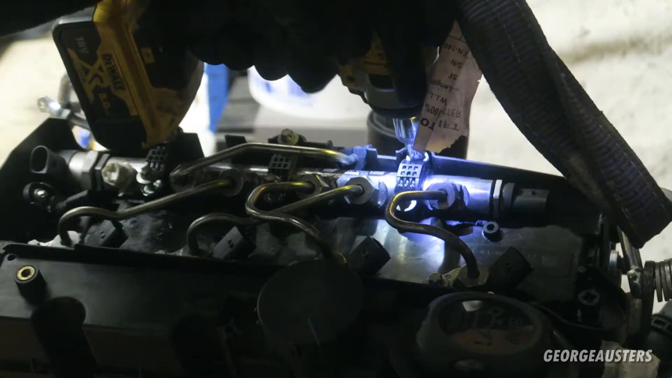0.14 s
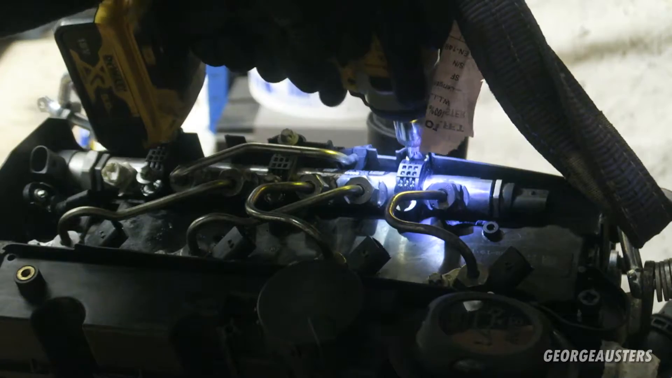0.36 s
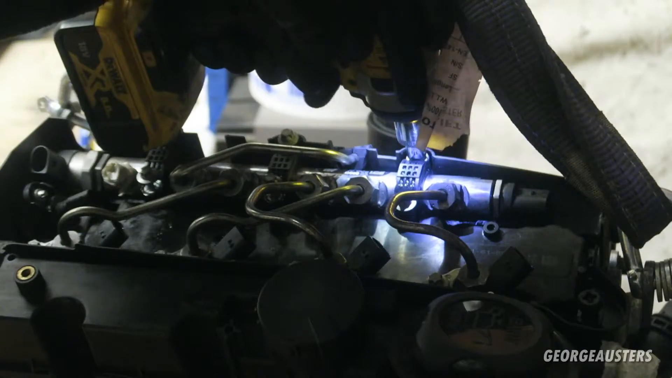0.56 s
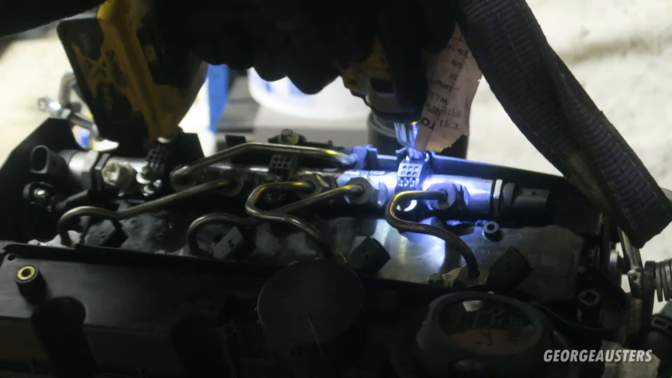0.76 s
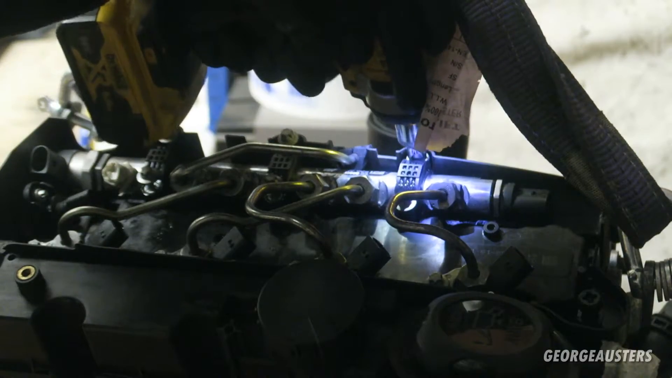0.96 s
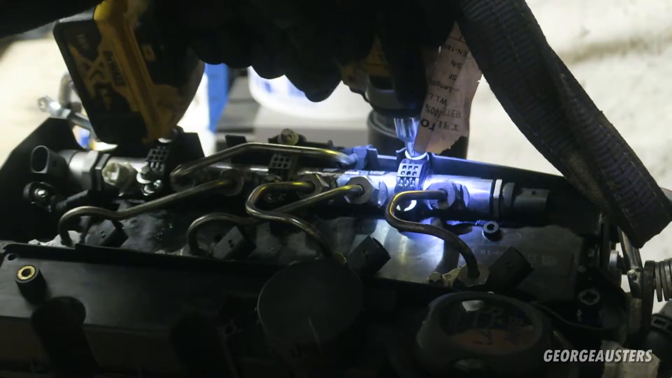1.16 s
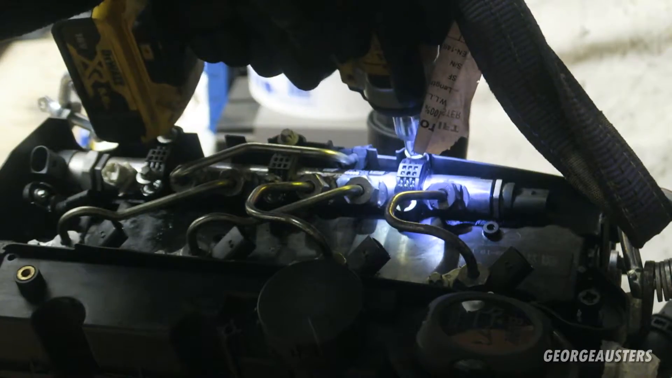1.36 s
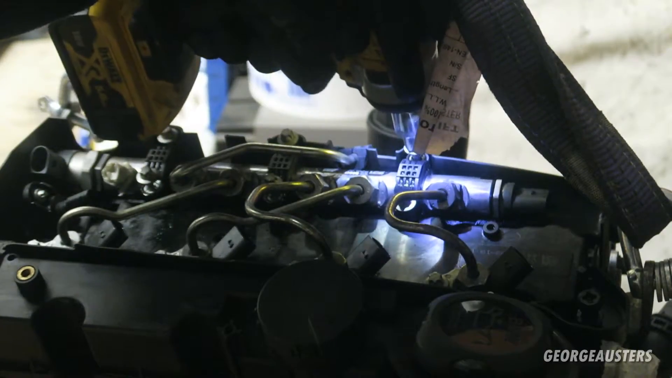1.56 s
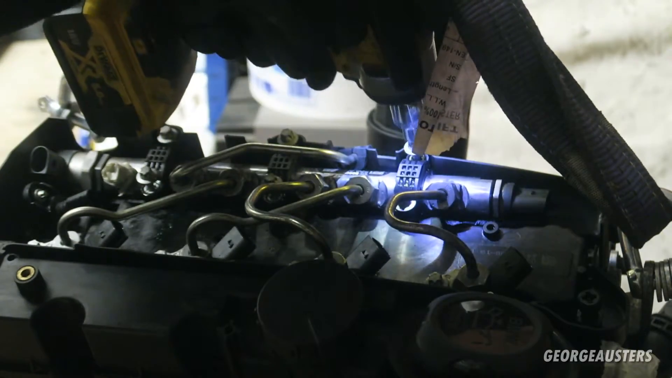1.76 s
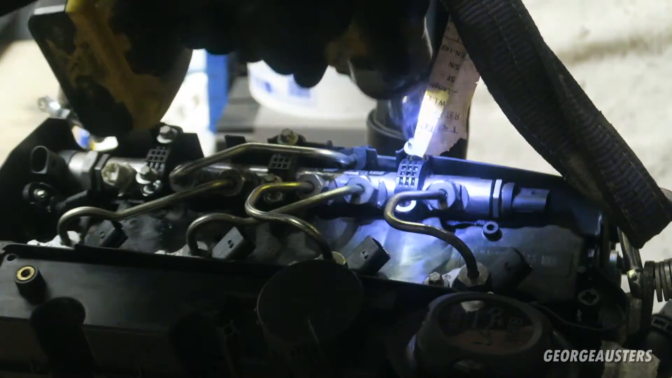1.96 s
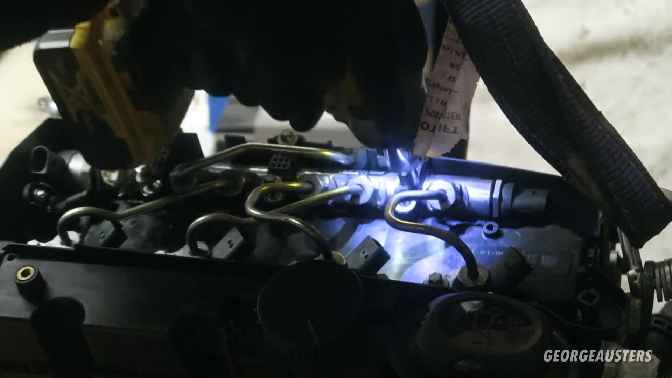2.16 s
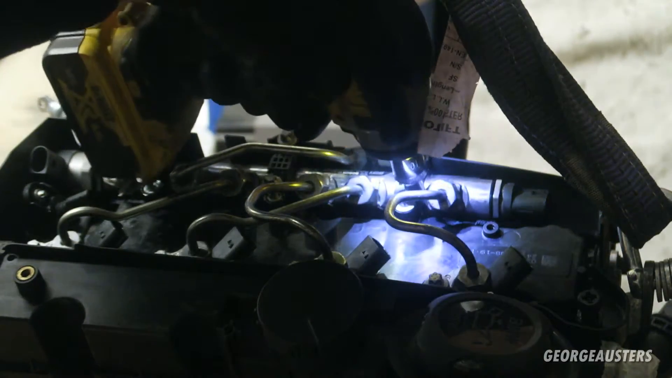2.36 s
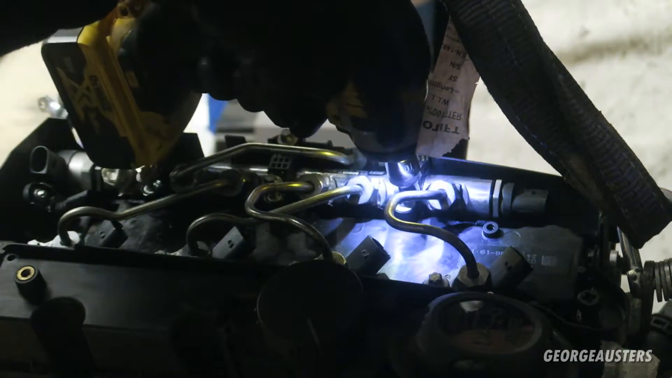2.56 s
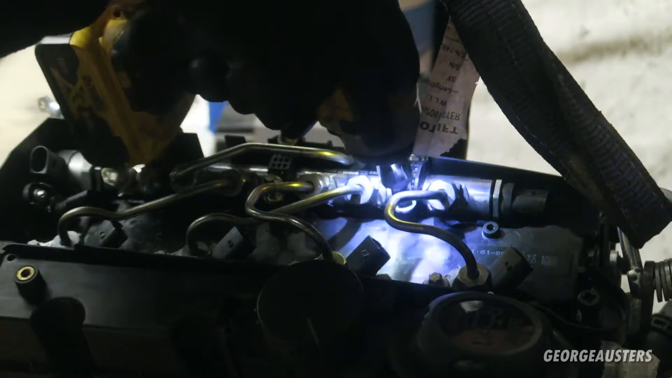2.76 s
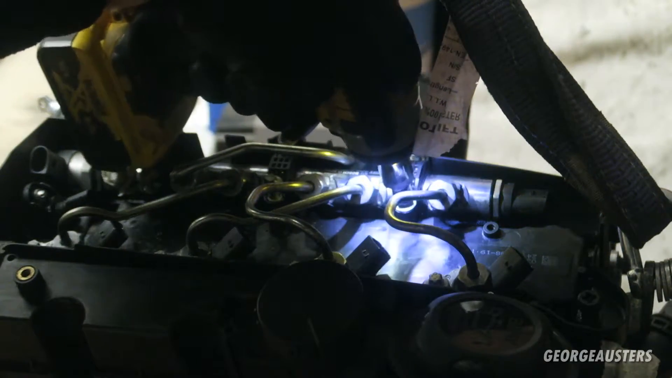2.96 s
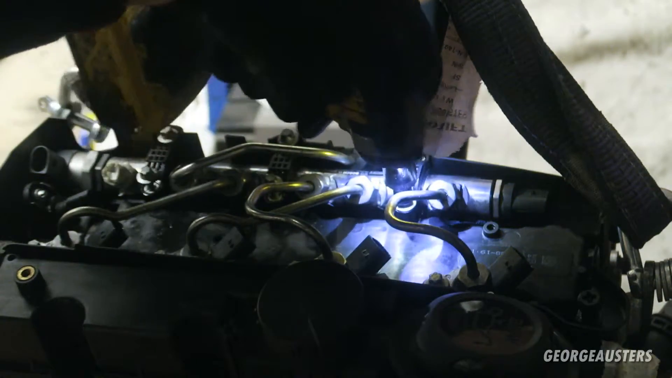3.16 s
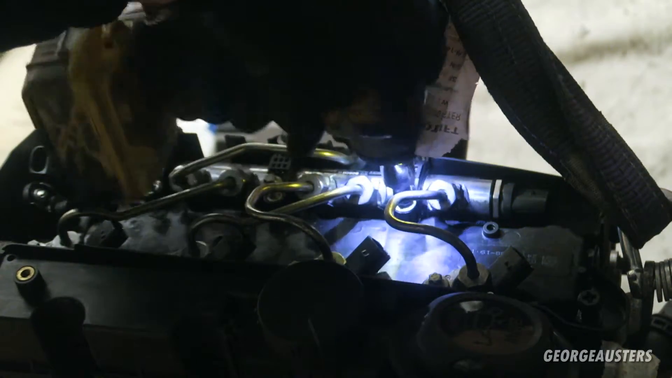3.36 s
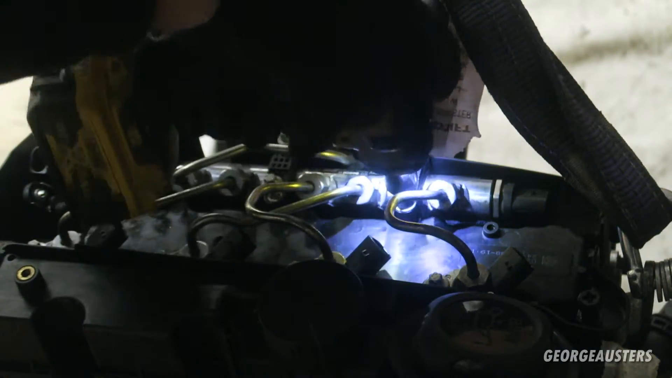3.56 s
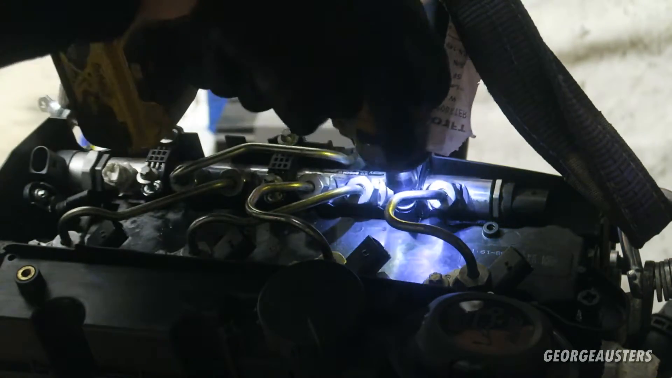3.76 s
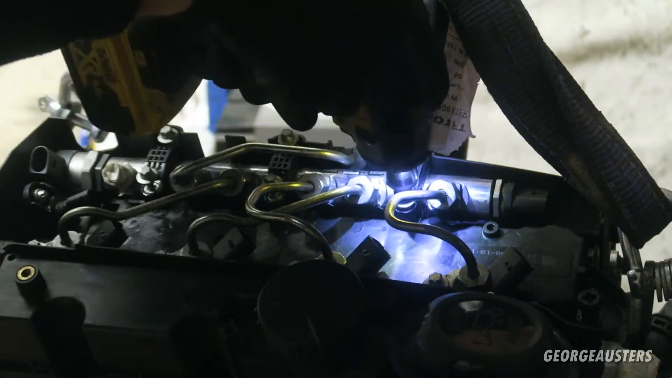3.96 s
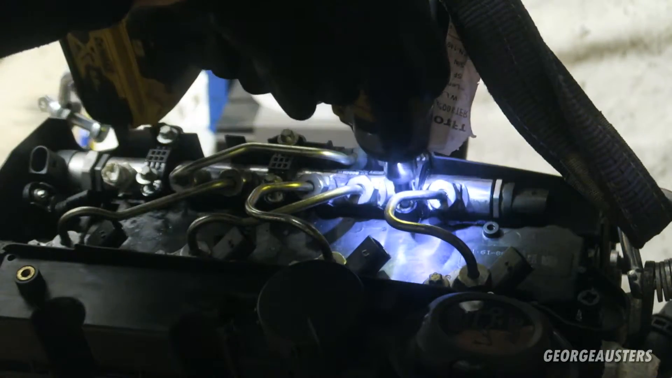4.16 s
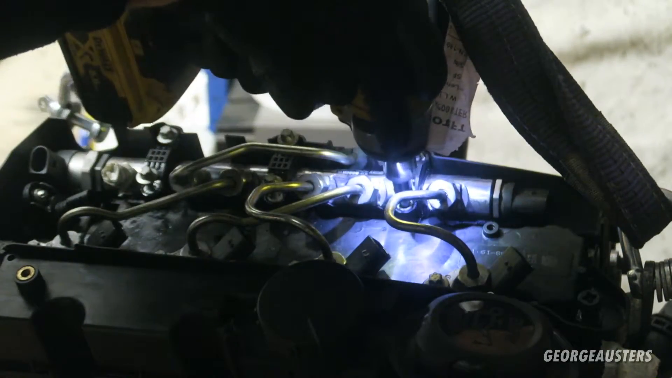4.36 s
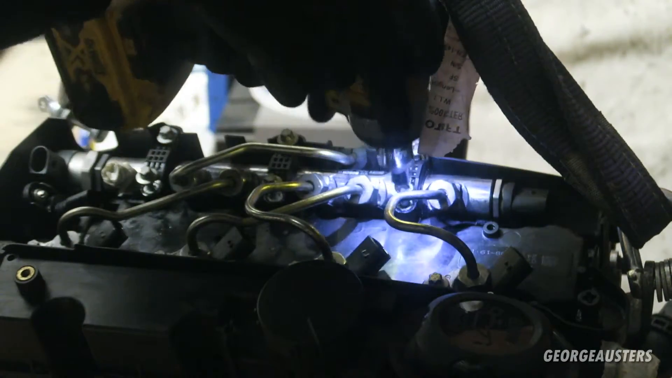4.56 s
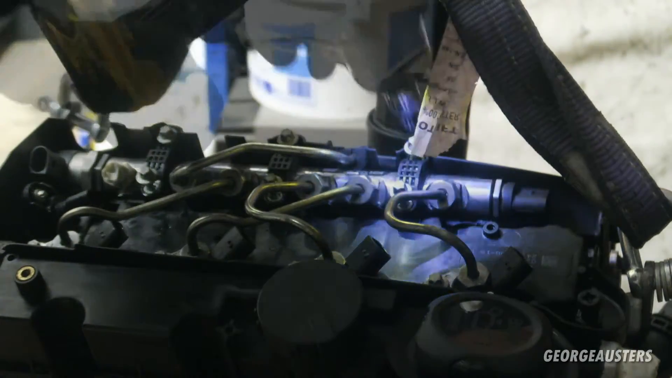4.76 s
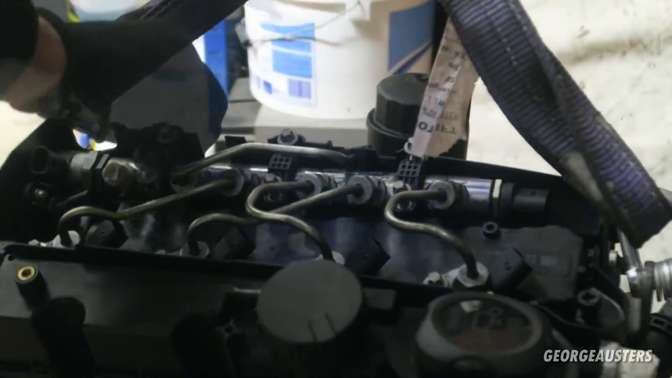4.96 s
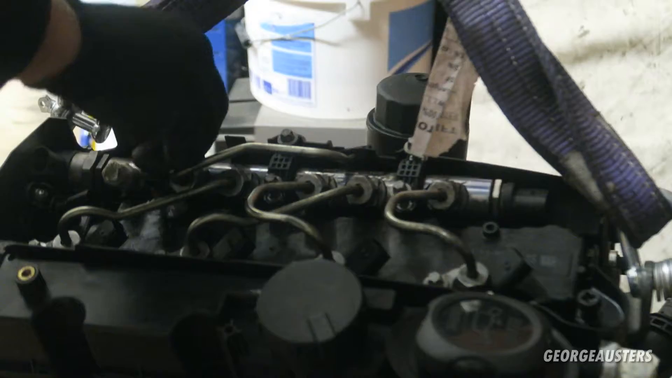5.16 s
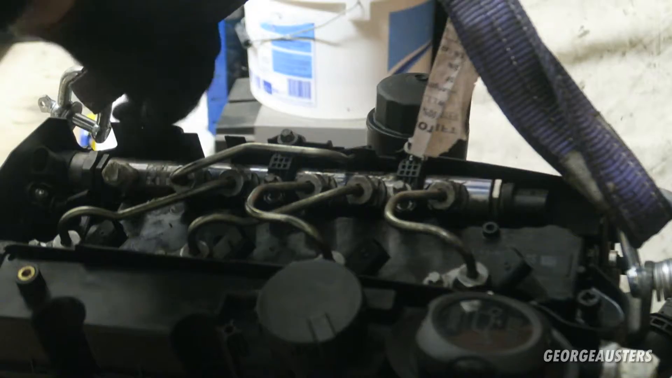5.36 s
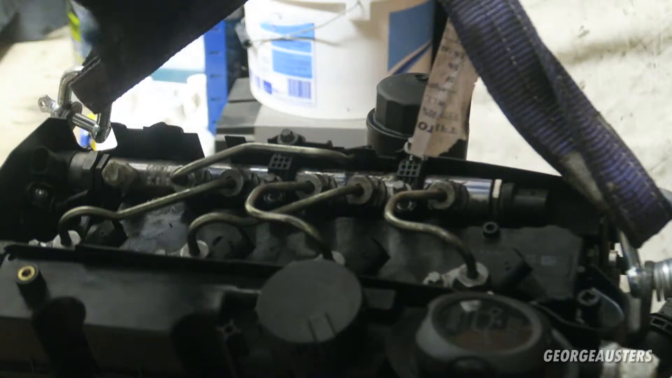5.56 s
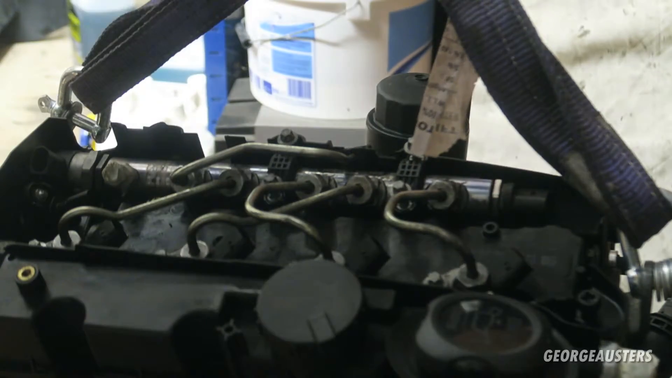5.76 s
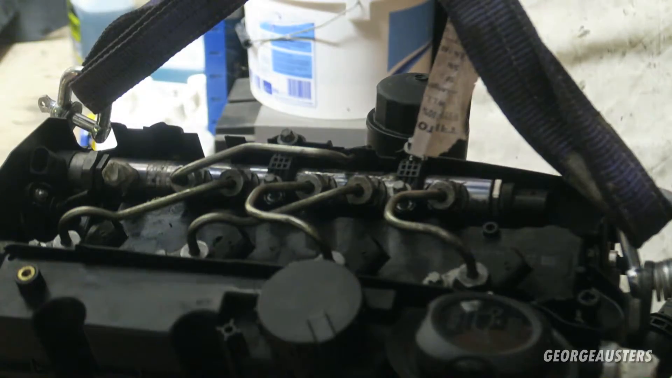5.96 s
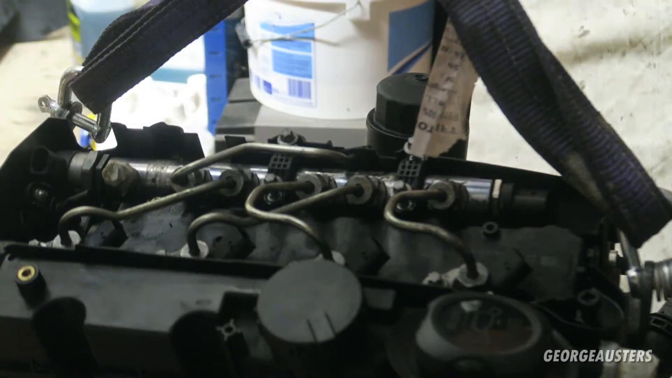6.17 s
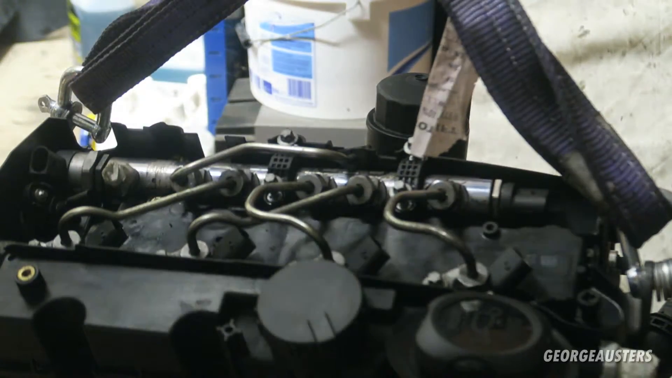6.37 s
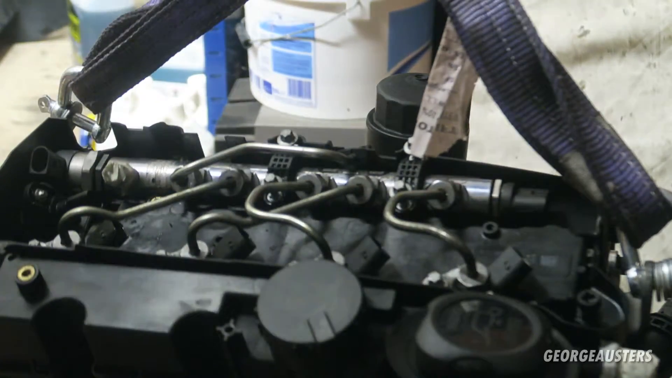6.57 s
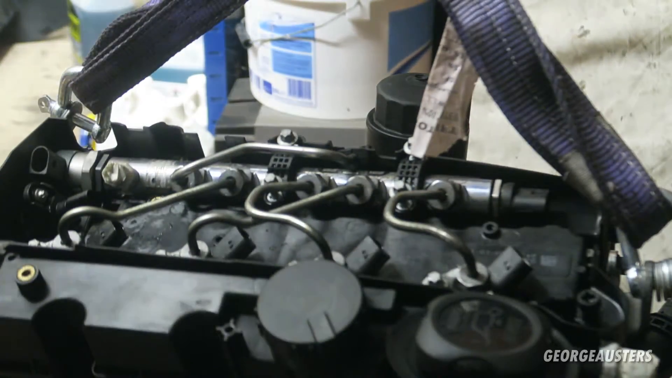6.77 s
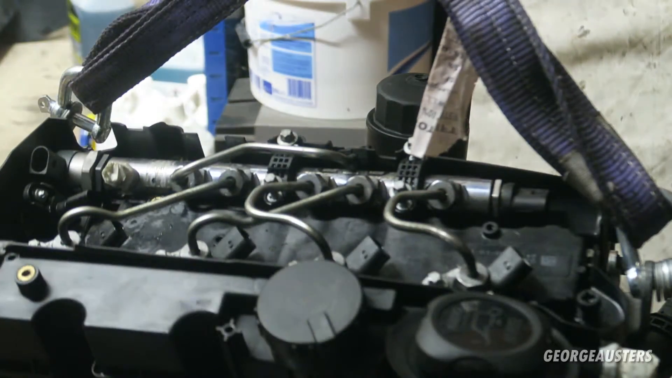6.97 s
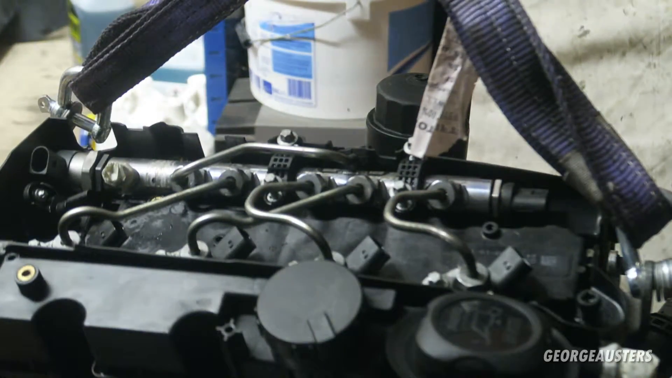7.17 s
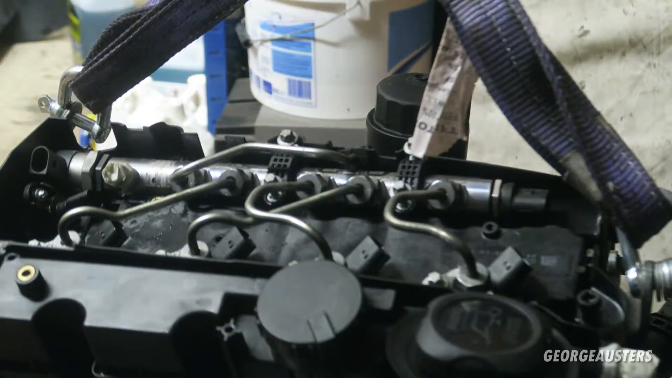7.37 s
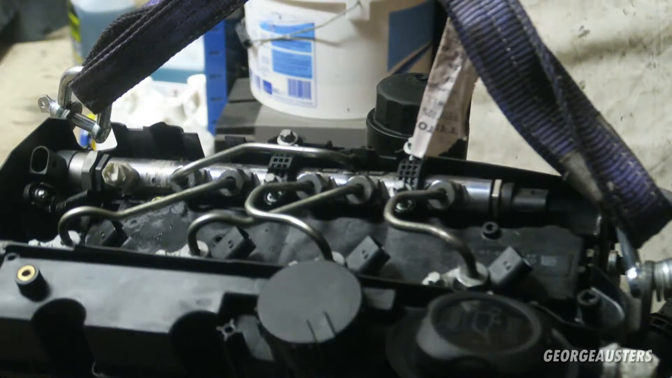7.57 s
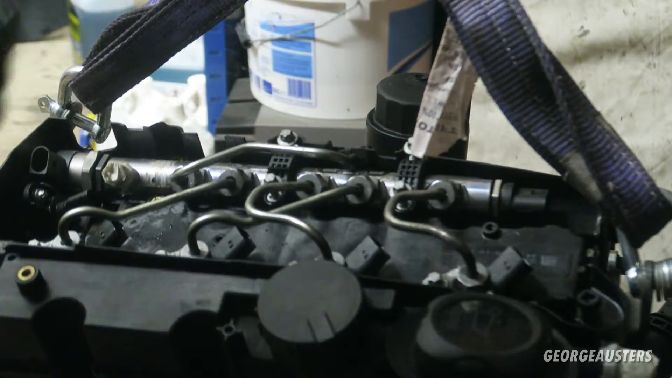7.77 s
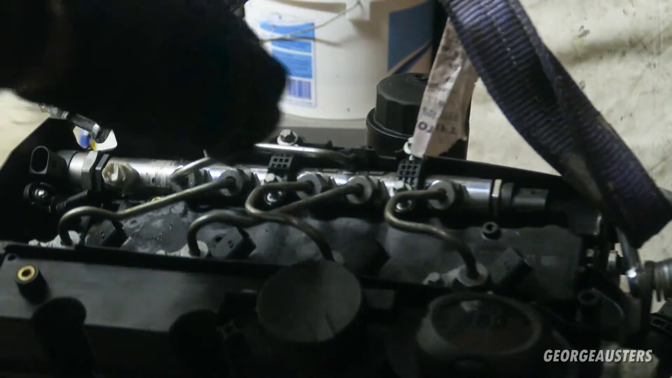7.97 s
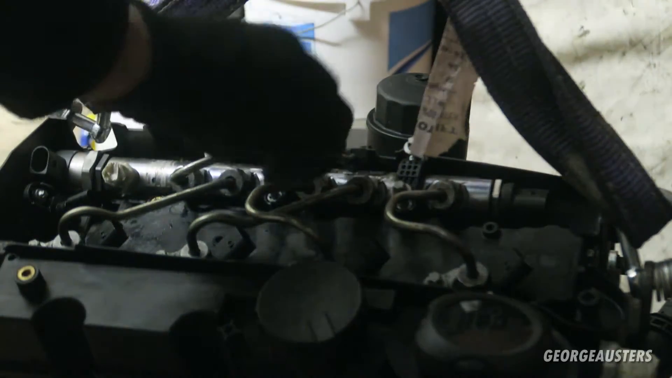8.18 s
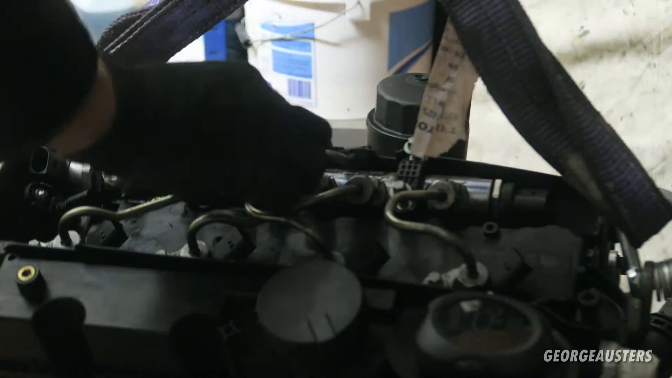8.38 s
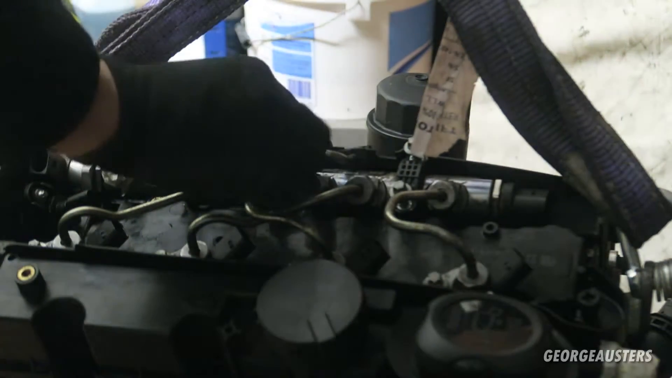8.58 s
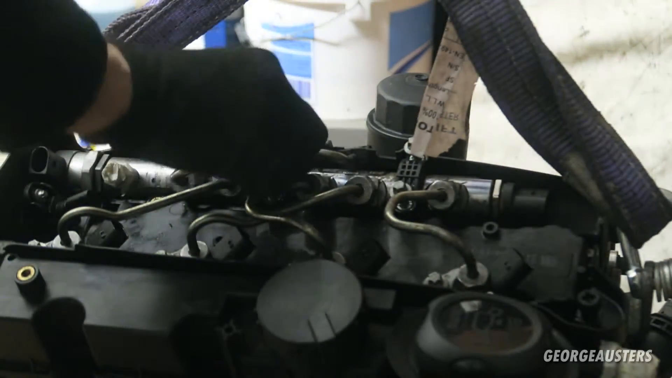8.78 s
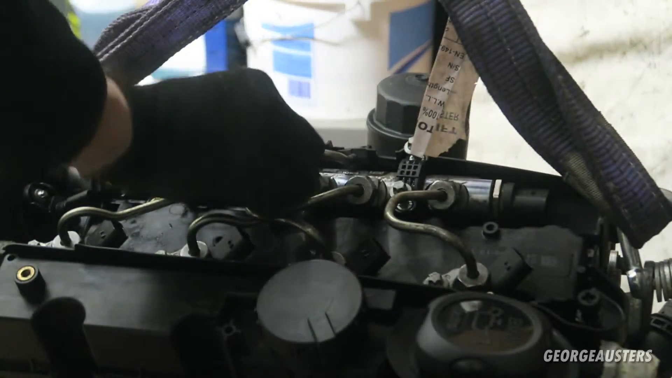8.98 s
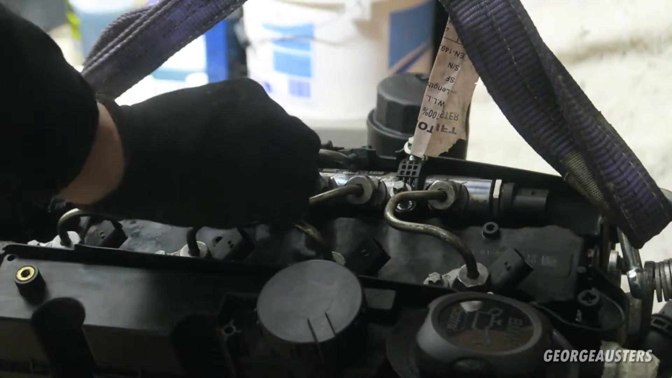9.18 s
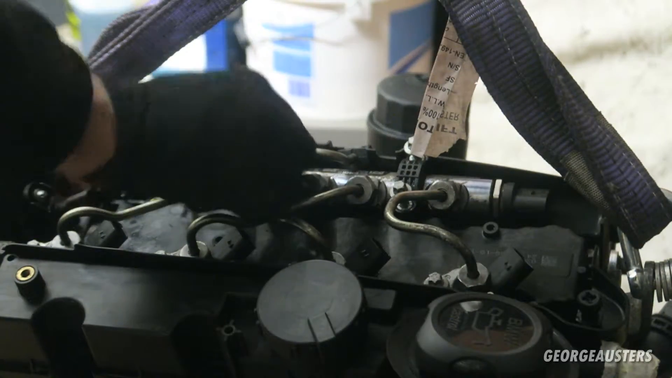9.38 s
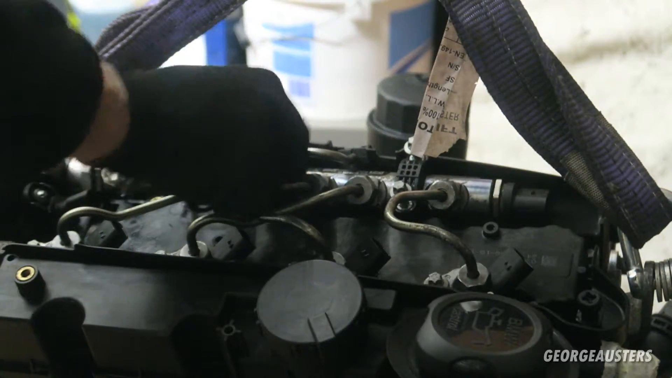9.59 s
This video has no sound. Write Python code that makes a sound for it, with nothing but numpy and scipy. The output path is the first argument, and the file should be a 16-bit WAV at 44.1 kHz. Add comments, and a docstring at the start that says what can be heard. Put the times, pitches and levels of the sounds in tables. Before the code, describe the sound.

Close stereo microphone in a small reverberant garage. A cordless impact driver gives a short chirp of motor, then whining pulls with violent hammer cracks around one second. After a lull of knocks and cloth rubs, a socket clacks onto metal, a second bolt breaks loose and the motor spins freely down. Small clinks, dull bumps and faint rustles follow over a soft low hum.

```python
"""In a garage, close to the microphone, a cordless impact driver undoes two bolts on an engine.
Gear-mesh harmonics and shaped noise whine as the motor winds up; noise bursts through resonances hammer.
The socket knocks on the bolt heads, the tool is put down, loose metal clinks: lighter bursts, other modes.
Cloth rubs in random grains, decaying modes bump, and noise tails give reflections over a rush and low hum.
The hardest blows push the recorder's gain down, and it takes two seconds to creep back."""
import sys
import numpy as np
from scipy import signal
from scipy.fft import rfft, irfft
from scipy.io import wavfile
from scipy.ndimage import uniform_filter1d

SR = 44100
rng = np.random.default_rng(int(sys.argv[2]) if len(sys.argv) > 2 else 0)


def inscribe(sig):
    """Save sig as 16-bit PCM at rate SR to the path in sys.argv[1].

    A 1-D sig is mono; a 2-D sig holds one channel per row.
    Samples are clipped to [-1, 1] before scaling.
    """
    pcm = np.round(np.clip(np.atleast_2d(sig).T, -1, 1) * 32767)
    wavfile.write(sys.argv[1], SR, pcm.astype(np.int16))


N = 424683
TAPS = 8192  # size of the filter spectra; responses last half of it
HZ = np.fft.rfftfreq(TAPS, 1 / SR)

# hammer blows on the anvil, and at 0.789 s the socket taking up slack: t/s, relative level/dB,
# bass/dB, edge/dB, treble/dB, ring f/Hz, ring height/dB (sign ignored), chatter decay/s
TOOL_IMPACTS = [ (0.2988, -16.5, -21.5, 2, -0.5, 1470, 10, 0.00067),
                (0.3058, -13.5, -7, 0, -2.5, 4620, 3, 0.0032),
                (0.7891, -23, -9.5, 0.5, -7.5, 1442, 8, 0.00078), (0.8738, -17, -3, 4, 0.5, 1499, 3, .001),
                (.878, 0.5, -11, -3, -12.5, 1394, 5, .003), (.886, -10, -7, 1, -8.5, 1757, 5.5, .014),
                (.899, -1, -6.5, -2, -13, 1350, 3, 0.043),
                (1.064, -10.5, -5.5, -3.5, -15.5, 1627, 3.5, .007),
                (1.072, 12, -13.5, -1, -10, 1643, 6.5, .0017),
                (3.736, -19.5, 4.5, 2.5, 0.5, 2770, -1, .003), (3.757, -12, 3.5, 1.5, -13, 2720, 5, 0.0032),
                (3.769, -2.5, -8, 1.5, -4.5, 2400, 5.5, .003), (3.7775, -14.5, 3, 4, -1, 2300, 8, .003), ]
# resonances of the socket and tool: f/Hz, width/Hz, height/dB
TOOL_MODES = [(370, 62, 7.5), (790, 70, 7), (845, 34, 5), (1290, 63, 9), (1518, 110, 3.5), (1750, 210, 9),
              (2563, 83, 6.5), (3221, 110, 8), (3845, 240, 6.5), (4580, 190, 8)]
# every impact also shakes the whole engine: level re the impact's listed level/dB, f/Hz, T60/s
ENGINE_SHAKE = (-26, 83, 0.47)


def driver():
    """Superposition of the tool's sources: gears, speed controller, threads and impacts."""
    return gears() + controller_whistle() + thread_squeals() + tool_impacts()


def gears():
    """Gear-mesh radiation, one burst for each pull of the trigger."""
    # pulls of the trigger: t/s, squeeze time constant/s, held/s, run-down/s, top gear mesh f/Hz,
    # relative level/dB, share of clean whine at top speed (0-1), rattle under drive/dB, overtones/(dB/octave)
    trigger_pulls = [(.269, 0.0027, .036, 0.17, 1585, -33, 0.4, -8, -3),
                     (.788, .0014, 0.18, 0.088, 1438, -26.5, 0.22, 0, 0),
                     (1.034, 0.01, 0.11, .16, 1909, -14.5, 0.2, -5, -5.5),
                     (1.36, 0.017, 0.19, 0.19, 1123, -21.5, 0.37, -7.5, 1),
                     (3.725, 0.0041, 0.071, 0.15, 1823, -21, 0.4, -17, -3),
                     (4, 0.0087, 0.27, .385, 1996, -21, 0.48, -9.5, 1)]
    out = np.zeros(N)
    for row in trigger_pulls:
        add(out, *pull(row))
    return gain_of(-2.0) * out


def pull(row, jitter=.014, flutter=0.51, grit=0.24, casing=0.12):
    """Gear-mesh harmonics and friction noise, both amplitude-modulated by the turning rotor."""
    # colour of the running gearbox: f/Hz, relative density/(dB per Hz)
    gearbox_colour = [(60, -49.5), (200, -18), (350, -8.5), (500, -4.5), (800, -3), (1000, -5.5),
                      (1400, -0.5), (2700, -5), (4600, -7), (6500, -12), (9000, -19.5), (12000, -17.5),
                      (13300, -34), (16000, -48.5)]
    # how well the casing radiates the gear whine: f/Hz, level/dB
    casing_radiation = [(400, -11), (1100, -4), (2000, -3.5), (2250, -3), (3250, -3.5), (4000, -6.5),
                        (4450, -1), (4850, -1.5), (5500, -10), (6000, -18.5), (6650, -11), (8000, -19),
                        (12000, -35)]
    teeth = 6  # gear teeth passed per hum of the rotor
    rotor_db, throb_depth, overtone_coast_db = -10, 0.19, -11  # the last per octave, at the end of the coast
    s, squeeze_s, held_s, run_down_s, top_hz, level_db, clean, tight_db, overtone_db = row
    mesh_hz, effort, rattle_db, coast = motor(s, squeeze_s, held_s, run_down_s, top_hz, tight_db)
    size = len(mesh_hz)
    speed = mesh_hz / top_hz
    clean = np.clip(clean, 0, 1) * speed ** 1.2  # the gears sing best near top speed
    backlash = jitter * (1.15 + 9 * (1 - speed)) * drift(size, 160)  # rougher away from top speed
    turns = np.cumsum(mesh_hz * (1 + backlash)) / SR
    rotor = np.cos(2 * np.pi * turns / teeth)
    throb = 1 + throb_depth * rotor

    whine = np.zeros(size)
    for k in range(1, 8):
        # the overtones die away as the gears coast
        slope_db = overtone_db + overtone_coast_db * coast
        harmonic_db = read(casing_radiation, k * mesh_hz) + slope_db * np.log2(k)
        unevenness = 1 + flutter * drift(size, 100)  # uneven teeth make each overtone flutter on its own
        whine += gain_of(harmonic_db) * unevenness * np.sin(2 * np.pi * (k * turns + rng.random()))
    whine = throb * whine + gain_of(rotor_db + read(gearbox_colour, mesh_hz / teeth)) * rotor

    scrape = rng.standard_normal(size) * throb * np.exp(grit * drift(size, 430))
    grind = evened(ring(scrape, read(gearbox_colour, HZ) + casing * peaks(TOOL_MODES))[:size])
    low = signal.sosfiltfilt(signal.butter(2, 700, fs=SR, output="sos"), grind)
    grind = grind + (gain_of(rattle_db) - 1) * low
    blend = np.sqrt(clean) * evened(whine) + np.sqrt(1 - clean) * evened(grind)
    return s, gain_of(level_db) * effort * blend


def motor(s, squeeze_s, held_s, run_down_s, top_hz, tight_db):
    """First-order spin-up and accelerating run-down set mesh frequency, effort, rattle and coast."""
    # the motor jumps to a first speed, winds up towards its top and sags ever faster once released
    start_hz, spin_up_s, run_down_power = 449.5, .05, 2.6
    # loudness follows speed, and fades as the gears lose their drive
    db_per_octave, coast_db, coast_power = 2, -44, 5.3
    # low rattle of the socket once it comes loose in the run-down, and the time constant of loosening
    loose_db, loosen_s = -0.5, 0.028
    t = np.arange(0, held_s + run_down_s, 1 / SR)
    released = np.maximum(t - held_s, 0)
    coast = released / run_down_s
    wound_up_hz = top_hz + (start_hz - top_hz) * np.exp(-t / spin_up_s)
    mesh_hz = wound_up_hz * (1 - coast ** run_down_power) + 1
    level_db = db_per_octave * np.log2(mesh_hz / top_hz) + coast_db * coast ** coast_power
    level_db = level_db + spring_strain(s + t)
    rattle_db = loose_db + (tight_db - loose_db) * np.exp(-released / loosen_s)
    effort = gain_of(level_db) * (1 - np.exp(-t / squeeze_s))
    return mesh_hz, effort, rattle_db, coast


def spring_strain(time_s):
    """Energy storage: the gears strain (dB) as the spring winds up, the more the harder the blow."""
    strain_db, width_s, lead_s = 8, 0.037, 0.0038
    easy_blow_db, range_db = -20, 19
    strains = []
    for blow_s, blow_db, *_ in TOOL_IMPACTS:
        hardness = np.clip((blow_db - easy_blow_db) / range_db, 0, 1)
        strains.append(hardness * np.exp(-((time_s + lead_s - blow_s) / width_s) ** 2))
    return strain_db * np.max(strains, axis=0)


def controller_whistle():
    """Near-pure tone: the speed controller whistles while the trigger is half pressed."""
    # whistles: t/s, length/s, level/dB
    half_presses, whistle_hz = [(.267, 0.04, -42.5), (.767, .077, -43), (1.019, 0.051, -40),
                                (1.358, .1, -35), (1.627, 0.034, -38.5)], 3860
    out = np.zeros(N)
    for s, length, db in half_presses:
        add(out, s, gain_of(db) * tone(length, whistle_hz, whistle_hz, waver=0.0055))
    return out


def thread_squeals():
    """Friction-driven tone with gliding pitch: a tight thread squeals as it gives."""
    # squeals: t/s, length/s, start f/Hz, end f/Hz, relative level/dB
    tight_threads = [(.825, 0.021, 820, 870, -31.5), (3.436, .03, 1062, 1085, -23),
                     (3.467, 0.021, 1076, 1060, -23.5), (3.742, 0.013, 2835, 2580, -17)]
    out = np.zeros(N)
    for s, length, start_hz, end_hz, db in tight_threads:
        add(out, s, gain_of(db + 0.5) * tone(length, start_hz, end_hz, waver=0.011))
    return out


def tool_impacts():
    """Impact excitation: hammer blows, and once the socket taking up slack, ring the tool's modes."""
    shake_db = -11.5  # the hammer twists more than it pushes, so it shakes the engine less
    out, shake = np.zeros(N), thud(*ENGINE_SHAKE)
    for row in TOOL_IMPACTS:
        s, sound = strike(row, TOOL_MODES, first=0.88, sub_db=-6.5, top_db=-21)
        add(out, s, gain_of(-4.0) * sound)
        add(out, s, gain_of(row[1] + shake_db) * shake)
    return out


def strike(row, modes, first, sub_db, top_db, clump=0.54):
    """Source-filter impact: a crack and dying chatter ring metal, with the energy of 10 ms at level_db."""
    s, level_db, bass_db, edge_db, treble_db, ring_hz, ring_db, chatter = row
    t = np.arange(TAPS // 2) / SR
    roughness = np.exp(.5 * rng.standard_normal(len(t)) + clump * drift(len(t), 320))
    contacts = rng.standard_normal(len(t)) * roughness * np.exp(-t / max(chatter, 1 / SR))
    # bending waves spread the first contact in time: random phases, flat spectrum, then a 10 ms decay
    spread = rfft(rng.standard_normal(len(t)) * np.exp(-t / .0009))
    snap = np.roll(irfft(spread / abs(spread)), 20) * np.exp(-t / .01)
    sharpness = first * np.exp(-chatter / 0.031)  # a long scrape has no sharp start
    drive = contacts / np.linalg.norm(contacts) + sharpness * snap
    shape = [(30, bass_db + sub_db - 6.5), (190, bass_db + sub_db), (400, bass_db), (1250, 0.0028),
             (3300, edge_db), (8000, treble_db), (11800, treble_db - 3.0),
             (13500, treble_db + top_db * 0.45), (16000, treble_db + top_db)]
    colour_db = read(shape, HZ) + peaks(modes) + peaks(spot_modes(chatter))
    colour_db = colour_db + peaks([(ring_hz, ring_hz / 4, ring_db)])
    sound = ring(unbiased(drive), colour_db)
    return s, gain_of(level_db) * sound * np.sqrt(SR / 100) / np.linalg.norm(sound)


def spot_modes(chatter_s, count=12):
    """Modal excitation depends on position: each contact spot wakes its own narrow modes."""
    low_hz, high_hz, width_hz, greatest_db = 908, 8954, 40, 9
    smear_s = 0.014  # time constant: a longer sliding contact smears its modes
    place, force = rng.random((2, count))
    hz = low_hz * (high_hz / low_hz) ** ((np.arange(count) + place) / count)
    height_db = greatest_db * (.5 + .5 * force) * np.exp(-chatter_s / smear_s)
    return list(zip(hz, width_hz * np.sqrt(hz / np.median(hz)), height_db))


def handling():
    """Superposition of part sounds: knocks and rattle, ringing pipe, cover bumps and rustles."""
    return knocks_and_rattle() + pipe_pings() + cover_bumps() + rustles()


def knocks_and_rattle():
    """Impact excitation: metal knocks and clinks, and a run-down rattle, ring and shake the engine."""
    # knocks and clinks, and at 4.5 s a rattle as the motor runs down: t/s, relative level/dB,
    # bass/dB, edge/dB, treble/dB, ring f/Hz, ring height/dB (sign ignored), chatter decay/s
    impact_bursts = [ (0.147, -49.5, 12, 9, -24, 1530, 9.5, 0.0026),
                     (0.312, -18.5, 8, 8, -9, 4555, 2, 0.0096),
                     (0.416, -27.5, 1, -7, -29, 1400, 11.5, 0.0062),
                     (0.43, -33.5, 12.5, -4, -22, 1250, 2, 0.004),
                     (2.285, -32.5, 4.5, -5, -7, 2900, 15.5, 0.0073),
                     (2.3041, -20, 7.5, -0.5, -15.5, 4420, 12, 0.0012),
                     (2.312, -31.5, 6, 4, -14, 4400, 9, .02), (2.382, -37, -0.5, -4, -26, 2600, 3, 0.0032),
                     (2.8248, -21.5, 0.5, 7.5, -13.5, 2900, 3.5, 0.0025),
                     (2.981, -41, 13.5, -7, -28, 1179, 8, 0.02), (3.246, -46.5, -2, 2, -1, 845, 7, 0.0077),
                     (3.392, -41.5, 2.5, -6.5, -17.5, 2577, 8, 0.00079),
                     (3.424, -11, 2, 2.5, -19, 1240, 4, 0.0022), (3.428, -15, 9, -9, -31, 1147, 13, 0.012),
                     (3.503, -18, 7, 1, -13, 2310, -2.5, .002), (3.511, -28.5, 8, -3, -24, 2000, -1, 0.018),
                     (4.503, -23, -16.5, -4, -8, 5035, 16, 0.015),
                     (4.8499, -46.5, 2.5, -20, -9, 4470, 16, 0.0034),
                     (4.864, -40, -8, -5, -18.5, 1510, 3, 0.011),
                     (4.877, -27, -14.5, -8, -25, 745, 12.5, 0.014),
                     (4.954, -29.5, -7, -10, -22.5, 1760, 9, 0.012),
                     (4.974, -32.5, -5, 5, -12.5, 1940, 0, 0.012),
                     (5.064, -36.5, -2, -17, -31, 606, 1, 0.0098),
                     (5.091, -40.5, -11.5, -20.5, -24, 1834, 15.5, 0.0095),
                     (5.196, -42, -2, -7, -14, 1650, 10.5, 0.029),
                     (5.24, -46.5, -8, -9.5, -24, 1931, 14, 0.012),
                     (5.963, -34, 3.5, 0, -18.5, 2220, 3, 0.036),
                     (6.03, -34.5, -2, -10.5, -26, 2100, 2, 0.077),
                     (6.0717, -37.5, -2, -6, -18, 2278, 8, 0.024),
                     (6.2932, -42.5, 2.5, -27, -41, 1823, 6, 0.0091),
                     (6.55, -37.5, -4.5, -15.5, -51.5, 926, 7, 0.012),
                     (7.2842, -43.5, -11, -4.5, -4.5, 1750, 3, 0.0062),
                     (7.417, -38.5, -4, 4, -1, 2200, 2, 0.0067), (7.428, -40, 7, 6, 5, 3670, 8, 0.0036),
                     (7.445, -43.5, 3, -1, -7, 4694, 9, 0.049), (7.5046, -41, 7, 0, -8, 4500, 11, 0.037),
                     (7.581, -45.5, -8, 3, -2.5, 5420, 6, 0.01),
                     (8.861, -48, -5, -13, -28.5, 978, 9, 0.00721),
                     (8.8692, -43.5, -9.5, 2, -13, 1910, 6.5, 0.0071),
                     (8.911, -38.5, -14, 0, -10.5, 1750, 6.5, .004),
                     (9.1267, -24, -11.5, -8.5, -16.5, 6230, 13.5, 0.0059),
                     (9.1342, -27.5, -17, 1, -10, 1409, 3.5, 0.0069),
                     (9.145, -28.5, -6, 2, -18, 2610, 5, .008), (9.16, -33.5, -5, -9, -34, 2100, 3, .008),
                     (9.183, -36.5, -12, -5, -26, 970, 14, 0.0076),
                     (9.228, -44, 11, -18, -35, 372, 21, 0.003),
                     (9.3508, -32, -15.5, -3.5, -21, 1570, 7, .0025), ]
    # resonances of the engine's pipes and cover: f/Hz, width/Hz, height/dB (sign ignored)
    engine_modes = [(382.6, 37, 7), (720, 260, 4), (1000, 25, -1), (1490, 150, 3), (1938, 160, 2.5),
                    (2200, 200, 0.5), (2658, 89, 0.5)]
    out, shake = np.zeros(N), thud(*ENGINE_SHAKE)
    for row in impact_bursts + clinks():
        s, sound = strike(row, engine_modes, first=0.22, sub_db=-8.5, top_db=-23.0)
        add(out, s, gain_of(-3.0) * sound)
        add(out, s, gain_of(row[1]) * shake)
    return out


def clinks():
    """Stochastic impacts: jiggling loose parts clink at random times, strengths and pitches."""
    # runs of small clinks: t/s, length/s, relative level/dB, treble/dB
    loose_parts = [(1.624, 0.033, -36.5, -18.5), (4.3, 0.097, -27, -4), (4.651, .0517, -45, -9)]
    clinks_per_s, spread_db = 30, 7  # spread to either side
    bass_db, edge_db, ring_db, chatter_s = 5, 3, -1.5, 0.002474  # sign of ring_db is ignored
    low_hz, high_hz = 1675, 4600
    rows = []
    for s, length, db, treble_db in loose_parts:
        count = max(round(length * clinks_per_s), 1)
        for k, (when, force, pitch) in enumerate(rng.random((20, 3))[:count]):
            clink_s = s + length * (k + when) / count
            ring_hz = low_hz * (high_hz / low_hz) ** pitch
            level_db = db + spread_db * (2 * force - 1)
            rows.append((clink_s, level_db, bass_db, edge_db, treble_db, ring_hz, ring_db, chatter_s))
    return rows


def pipe_pings():
    """Free decay of one lightly damped mode: a fuel pipe rings on after a knock."""
    # pings: t/s, f/Hz, level/dB
    ringing_pipe, t60_s = [(9.134, 1524, -42), (9.35, 1550, -44.5)], 0.3
    out = np.zeros(N)
    for s, hz, level_db in ringing_pipe:
        pipe = tone(.5, hz, hz, waver=.035, soft=.005)
        add(out, s, pipe * gain_of(level_db - 60 * np.arange(len(pipe)) / SR / t60_s))
    return out


def cover_bumps():
    """Modal superposition: dull bumps set off the low decaying modes of the engine cover."""
    # bumps: t/s, level/dB, tilt/(dB/octave)
    dull_bumps = [(0.311, -48, 13), (.879, -41, 18.5), (1.075, -31, -10.5), (3.425, -40, 10.5),
                  (3.759, -39.5, 4), (6.473, -49.5, 6.5), (6.607, -37.5, -2.5), (9.232, -50, 1.5)]
    # what the cover rings with: f/Hz, relative level/dB, T60/s
    cover_modes, pivot_hz = [(136.9, -3, .3), (180, 0.5, .17), (240, -0.5, .15), (297, -2, 0.26),
                             (391, -10.5, .08), (676, -10.5, 0.26)], 194
    out = np.zeros(N)
    for s, level_db, tilt_db in dull_bumps:
        for hz, db, t60 in cover_modes:
            add(out, s, thud(level_db + db + tilt_db * np.log2(hz / pivot_hz), hz, t60))
    return out


def thud(db, hz, t60):
    """Damped oscillator: one low, unsteady mode dying away exponentially."""
    t = np.arange(SR // 2) / SR
    swing = np.sin(2 * np.pi * np.cumsum(hz * (1 + 0.1 * drift(len(t), 88))) / SR)
    return gain_of(db - 60 * t / t60) * (1 - np.exp(-t / 0.0012)) * swing


def rustles():
    """Granular noise: cloth rubs on the engine, and at the end a knock's faint tail rings."""
    # rubs of cloth, and at 9.39 s the faint ringing tail of a knock:
    # t/s, length/s, level/dB, centre f/Hz, graininess/dB
    grainy_sounds = [(0.136, 0.072, -69, 2000, 19), (0.586, 0.081, -68, 4440, 14),
                     (1.803, 0.5, -76.5, 3490, 12), (2.12, 0.059, -58.5, 894, 1.5),
                     (2.471, 0.12, -51, 416.1, 4), (2.62, 0.24, -73.5, 4520, 16),
                     (3.031, 0.55, -74, 4340, 7), (2.968, 0.11, -58, 202, 2.5), (5.451, 0.41, -81, 2200, 4),
                     (5.55, 0.41, -59.5, 318.5, 6), (6.594, 0.05525, -62, 3460, 5.5),
                     (5.797, 0.2, -66, 1697, -0.5), (7.025, 0.141, -71, 2570, 6),
                     (7.682, 0.21, -64, 1783, 4), (8.994, 0.5391, -67.5, 3020, 0),
                     (9.393, .16, -67, 1545, 4)]
    out = np.zeros(N)
    for row in grainy_sounds:
        add(out, *rustle(row))
    return out


def rustle(row, grains_per_s=260):
    """Filtered random impulses: tiny grains, as of slipping cloth, more unequal with graininess."""
    s, length, db, centre_hz, grain_db = row
    chance, sign, size = rng.random((3, SR))[:, :int(length * SR)]
    grain_size = gain_of(grain_db * np.minimum(-np.log(size), 3))
    grains = (chance < grains_per_s / SR) * np.sign(sign - .5) * grain_size
    octaves = np.log2((HZ + 1) / centre_hz)
    sound = ring(grains, np.maximum(-12 * octaves ** 2 * (centre_hz / 1000) ** .5, -50))[:len(grains)]
    return s, gain_of(db) * evened(sound * signal.windows.tukey(len(sound), .4))


def ticks():
    """Short windowed tone bursts: faint soft-edged ticks, close and dry."""
    # ticks: t/s at the centre, level/dB
    faint_ticks = [(.035, -64), (.102, -59), (.172, -64), (.183, -70), (.228, -64.5), (.537, -64),
                   (.703, -63.5), (.74, -63), (5.508, -61.5), (8.545, -57.5), (8.68, -64), (8.745, -62.5),
                   (8.812, -62.5), (9.012, -60), (9.478, -53), (9.581, -67.5)]
    # what a tick rings with: f/Hz, relative level/dB
    tick_tones, tick_s = [(3750, -2), (5200, 0)], 0.0049
    out, t = np.zeros(N), np.arange(0, tick_s, 1 / SR)
    for s, level_db in faint_ticks:
        tick = np.zeros(len(t))
        for hz, db in tick_tones:
            detuned_hz = hz * (1 + 0.025 * rng.standard_normal())
            tick += gain_of(db) * np.sin(2 * np.pi * detuned_hz * t)
        add(out, s - tick_s / 2, gain_of(level_db) * evened(tick * np.hanning(len(t))))
    return out


def shifting_garage(x):
    """Time-varying reverberation: three tails take turns as tool and arms move."""
    turn = 2 * np.pi * np.arange(N) / SR * .83  # .83 turns per second
    out = np.zeros((2, N))
    for k in range(3):
        share = np.sqrt(2 / 3) * np.cos(turn + 2 * np.pi * k / 3)
        out += garage(x * share)
    return out


def garage(x, gap=0.0022, build=0.00054):
    """Diffuse reverberation: reflections from bonnet and walls build up and decay band by band."""
    # reverberation: f/Hz, T60/s
    reverberation = [(100, 0.36), (500, 0.1), (1400, 0.26), (3700, 0.23), (9700, 0.22), (15000, 0.089)]
    t = np.arange(SR // 2) / SR
    taps = rng.standard_normal((2, len(t))) * (1 - np.exp(-np.maximum(t - gap, 0) / build))
    early = np.exp(-t / .035)  # the early part decides the colour to be evened out
    taps = np.array([unbiased(channel, early) for channel in taps])
    hz, when, z = signal.stft(taps, SR, nperseg=256)
    decay = gain_of(-60 * when / read(reverberation, hz)[:, None])
    mid, side = signal.istft(z * decay, SR, nperseg=256)[1]
    return signal.fftconvolve(x[None], stereo(mid, side) / np.linalg.norm(mid), axes=1)[:, :N]


def stereo(mid, side):
    """Spatial coherence: the channels' likeness depends on frequency."""
    # most alike in the deepest bass, wide near 300 Hz, closer again near 1.3 kHz, wide in the high treble
    # ratio of side to mid: f/Hz, level/dB
    side_ratio = [(60, -23), (150, -1.5), (300, 1.5), (600, -3.5), (1300, -10), (2600, -6), (5000, -2),
                  (9000, 2.5), (13000, 1.5)]
    size = len(mid)
    width = gain_of(read(side_ratio, np.fft.rfftfreq(size, 1 / SR)))
    side = irfft(rfft(side) * width, size)
    return np.array([mid + side, mid - side])


def air():
    """Stationary filtered noise and phase-wandering tones: a soft rush and a wavering low hum."""
    # colour of the rush: f/Hz, relative density/(dB per Hz)
    rush_colour, rush_db = [(12, -31.5), (20, -16.5), (38, 0.5), (86, -11.5), (113, -10), (293, -16),
                            (347, -15.5), (472, -20.5), (660, -22.5), (1030, -25), (1190, -24), (2200, -29),
                            (3950, -33.5), (12200, -49), (13500, -58), (16000, -72)], -52.5
    # hum: f/Hz, level/dB
    hum_tones = [(40, -59), (83, -61)]
    t = np.arange(N) / SR
    colour = gain_of(read(rush_colour, np.fft.rfftfreq(N, 1 / SR)))
    mid, side = (evened(irfft(rfft(rng.standard_normal(N)) * colour, N)) for _ in range(2))
    hum = np.zeros(N)
    for hz, db in hum_tones:
        hum += gain_of(db) * evened(np.sin(2 * np.pi * hz * t + drift(N, 8.5)))
    waver_db = .6 * drift(N, 5)
    rush = gain_of(rush_db) * stereo(mid, side)
    return gain_of(waver_db) * (rush + hum)


def gain_control(x):
    """Feed-forward compression: loud sound steps the gain down, and it creeps back at a steady rate."""
    # a step over the knee, then a share of every dB beyond the limit
    limit_db, knee_db, step_db, excess_share = -16.5, 1.5, 12.5, 0.33
    sense_s, duck_s, recover_db_per_s = 0.032, 0.039, 9
    power = lag((x ** 2).mean(0), sense_s)
    over_db = np.maximum(10 * np.log10(power + 1e-12) - limit_db, 0)
    wanted_db = step_db * np.minimum(over_db / knee_db, 1) + excess_share * over_db
    recovery = recover_db_per_s * np.arange(N) / SR
    held_db = np.maximum.accumulate(wanted_db + recovery) - recovery
    return x * gain_of(-lag(held_db, duck_s))


def tone(length, start_hz, end_hz, waver, soft=.2):
    """Frequency modulation: a short unsteady sinusoid with soft ends, rms 1."""
    size = int(length * SR)
    hz = np.linspace(start_hz, end_hz, size) * (1 + waver * drift(size, 200))
    return evened(np.sin(2 * np.pi * np.cumsum(hz) / SR) * signal.windows.tukey(size, soft))


def peaks(modes):
    """Resonance curves: the dB sum of power-resonance peaks; a height's sign is ignored."""
    power = 1
    for hz, width, db in modes:
        power = power + (gain_of(abs(db)) ** 2 - 1) / (1 + (2 * (HZ - hz) / width) ** 2)
    return 10 * np.log10(power)


def ring(drive, colour_db):
    """Minimum-phase filtering: passes a drive through a causal body with this dB curve."""
    log_gain = np.log(gain_of(np.concatenate([colour_db, colour_db[-2:0:-1]])))
    spectrum = np.exp(np.conj(signal.hilbert(log_gain)))
    return signal.fftconvolve(drive, np.fft.ifft(spectrum).real[:TAPS // 2])


def unbiased(x, weight=1, band_hz=260):
    """Spectral whitening: takes the chance colour out of a burst, so that only the body colours it."""
    bins = max(int(band_hz / HZ[1]), 1)
    power = uniform_filter1d(abs(rfft(x * weight, TAPS)) ** 2, bins)
    return ring(x, -10 * np.log10(power / power.mean() + 1e-6))[:len(x)]


def drift(size, hz):
    """Low-pass Gaussian noise: slow chance of rms 1, moving at up to about hz."""
    f = np.fft.rfftfreq(size + SR, 1 / SR)
    noise = rfft(rng.standard_normal(size + SR))
    return evened(irfft(noise * np.exp(-(f / hz) ** 2)))[:size]


def lag(x, time_s):
    """First-order relaxation: follows x with this time constant."""
    keep = np.exp(-1 / (time_s * SR))
    return signal.lfilter([1 - keep], [1, -keep], x)


def read(points, hz):
    """Interpolation on a logarithmic frequency axis."""
    f, value = np.transpose(points)
    return np.interp(np.log(hz + 1), np.log(f + 1), value)


def gain_of(db):
    """Level to amplitude ratio: 20 dB per factor of ten."""
    return 10 ** (np.asarray(db) / 20)


def evened(x):
    """Power normalisation: scales to rms 1."""
    return x / np.sqrt(np.mean(x ** 2) + 1e-20)


def add(mix, s, sound):
    """Linear superposition: mixes a sound in at time s."""
    part = mix[max(round(s * SR), 0):][:len(sound)]
    part += sound[:len(part)]


def scene():
    """Direct and reverberant fields: the tool is nearest; handled parts carry more of the room."""
    tool, parts = driver(), handling()
    near = tool + parts
    glance = np.roll(near, 23)  # the tool body throws sound back from one side
    direct = stereo(near, gain_of(-18.5) * glance) * gain_of([[-.25], [.25]])
    reflected = shifting_garage(gain_of(-7.5) * tool + gain_of(-2.5) * parts)
    return direct + reflected + ticks() + air()


def record(dry):
    """Overload and band limit: blows too quick for the gain control clip, then a low-pass follows."""
    clipped = np.clip(gain_control(dry), -.97, .97)
    band_limit = signal.firwin(511, 15700, window=("kaiser", 9), fs=SR)  # cutoff in Hz
    return signal.oaconvolve(clipped, band_limit[None], "same")


dry = scene()
out = record(dry)
inscribe(out)
```